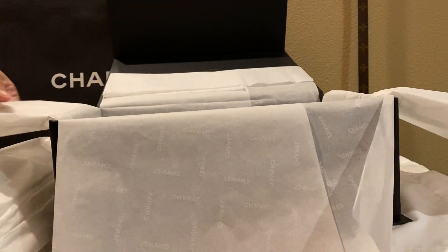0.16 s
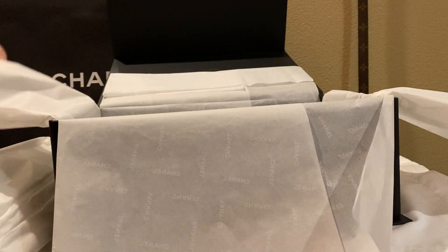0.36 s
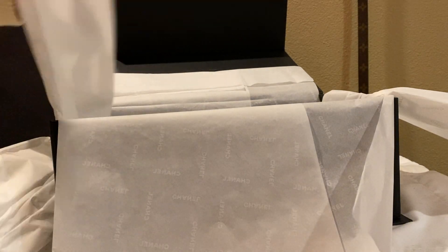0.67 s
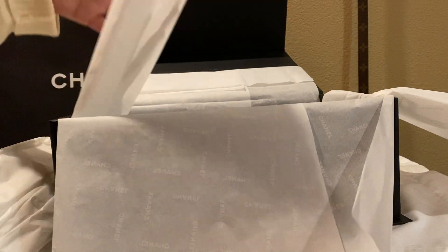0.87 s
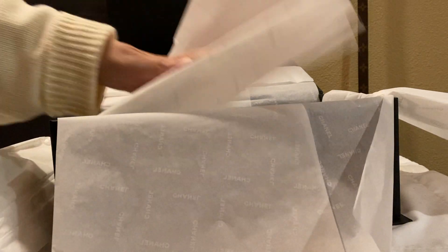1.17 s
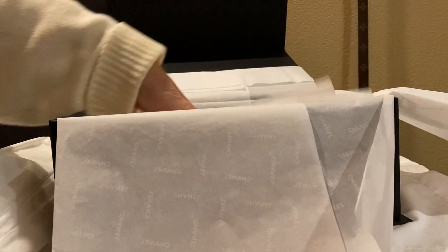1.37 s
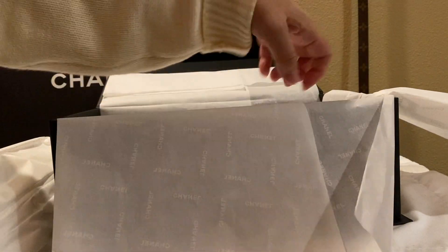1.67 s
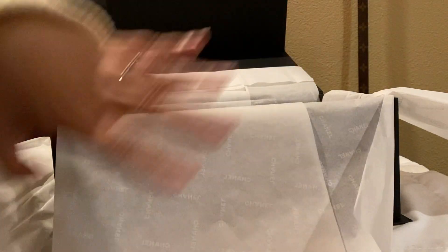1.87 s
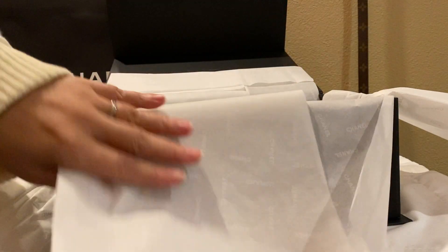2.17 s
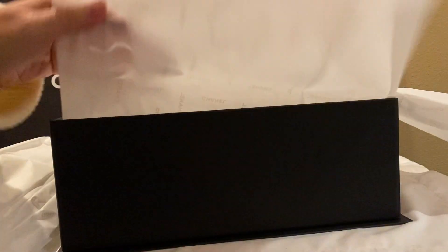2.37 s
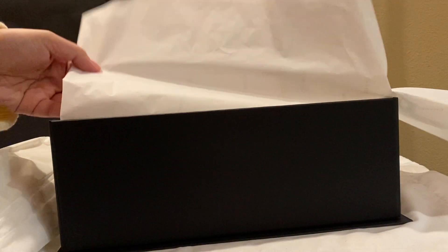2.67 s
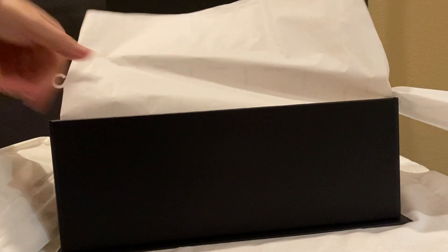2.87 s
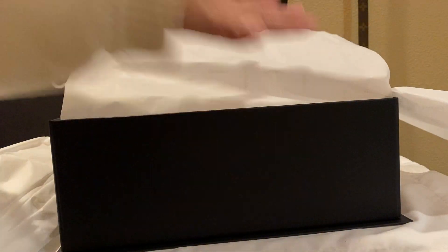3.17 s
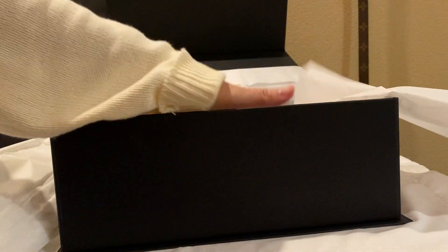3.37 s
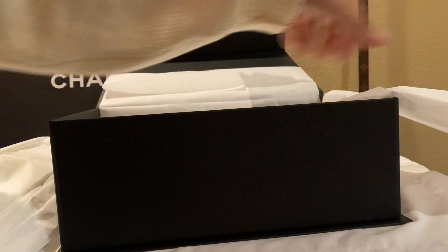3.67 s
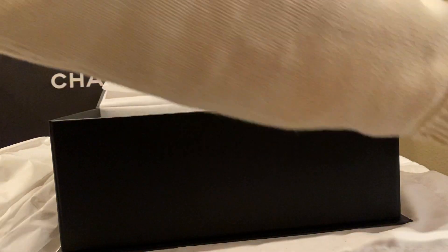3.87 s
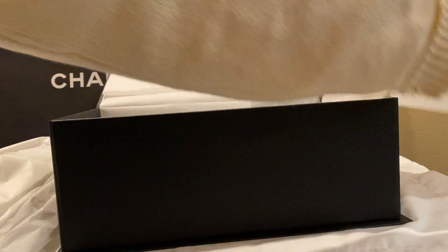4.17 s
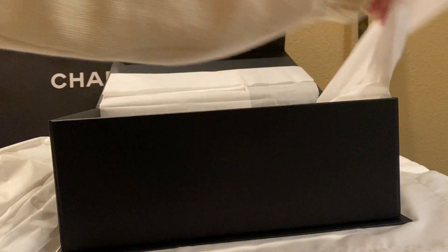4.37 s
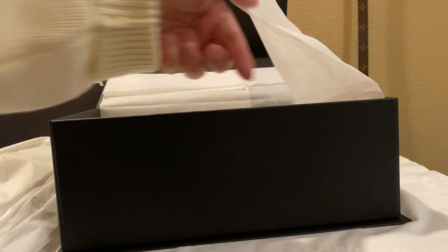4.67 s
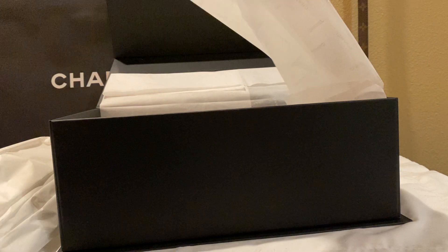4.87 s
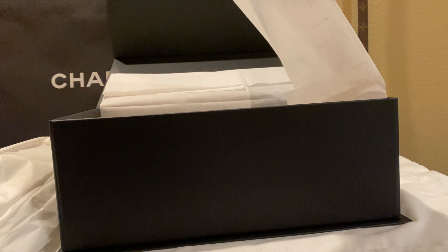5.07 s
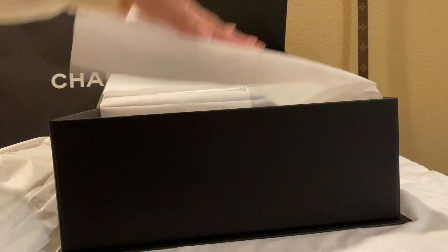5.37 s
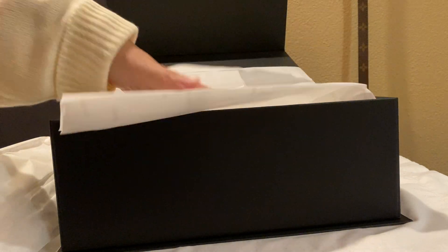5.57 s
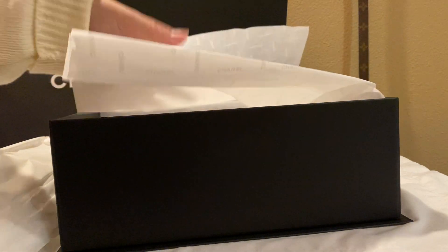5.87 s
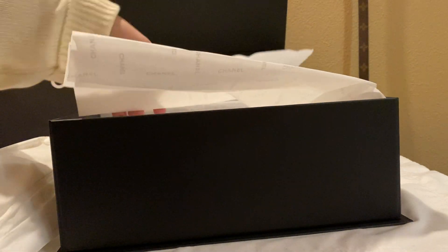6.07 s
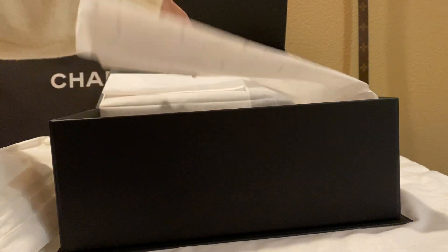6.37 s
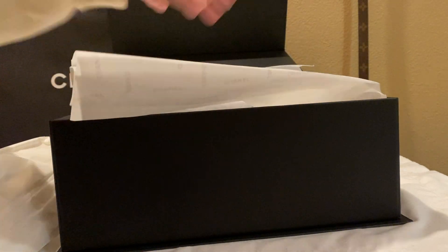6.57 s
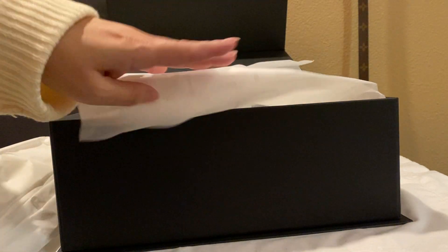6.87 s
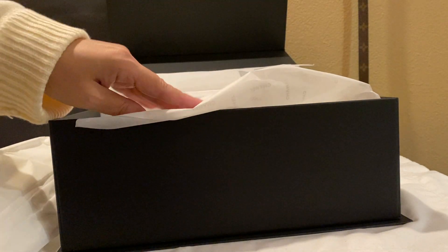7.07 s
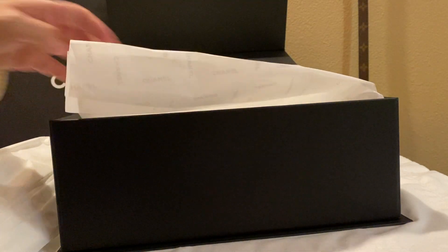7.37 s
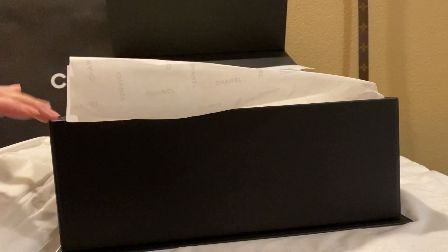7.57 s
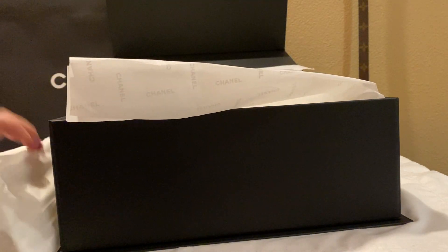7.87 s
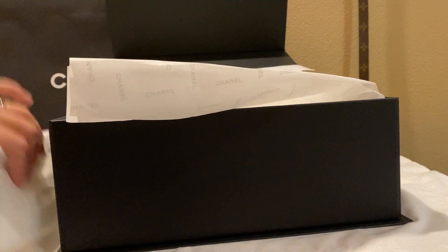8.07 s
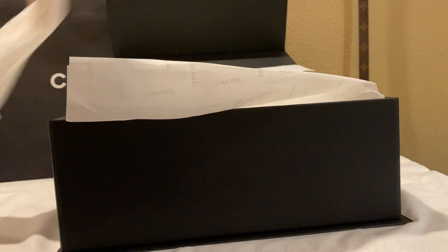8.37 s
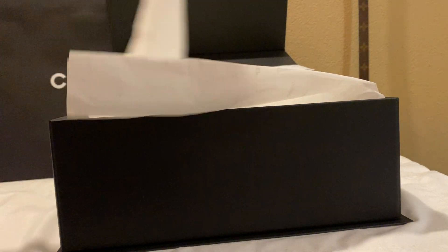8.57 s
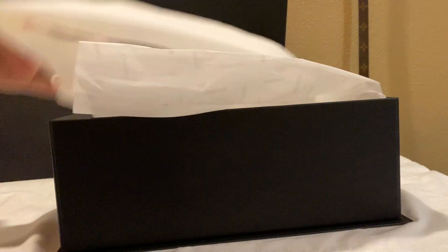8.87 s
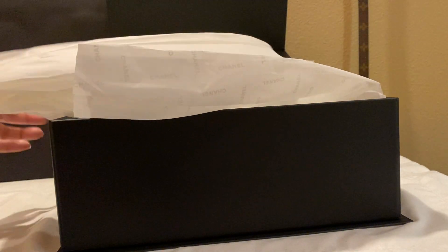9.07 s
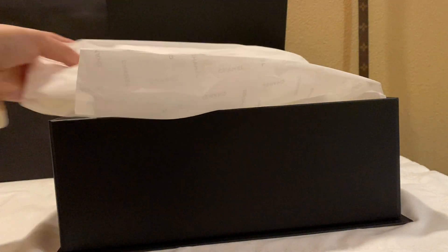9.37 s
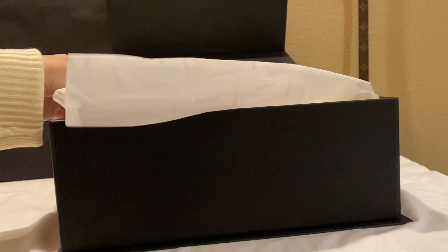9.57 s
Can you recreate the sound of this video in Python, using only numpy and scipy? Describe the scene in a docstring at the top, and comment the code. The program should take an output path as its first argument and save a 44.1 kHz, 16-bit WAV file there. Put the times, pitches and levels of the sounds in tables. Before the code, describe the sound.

Bright, dense paper crinkles start with small touches, grow into brisk folds, and break off into near silence with tiny ticks. The box adds a softer, hollow rustle and a few muted bumps. Later folds alternate between crisp and duller, fuller strokes until a sustained rustle closes the scene. It is recorded very near, in stereo, with a short dull room tail and a quiet bassy hum.

```python
"""A quiet furnished room, a bed, a two-port microphone close to the hands that fold tissue paper in and out of a box.
Thousands of tiny creases buckle in clumps: chance ticks, each with a dying noise flutter, shaped by drags and crushes.
Single creases snap as short noise bursts, and the cardboard box answers with a hollow rustle of slower grains.
A few soft thumps are decaying sines under a dull knock; a short room tail follows and filtered noise hums below."""
import sys
import numpy as np
from scipy import signal
from scipy.fft import rfft, irfft, next_fast_len
from scipy.io import wavfile
from scipy.ndimage import uniform_filter1d

SR = 44100
rng = np.random.default_rng(int(sys.argv[2]) if len(sys.argv) > 2 else 0)


def int16_out(signal):
    """Quantize to a 16-bit WAV file."""
    q = np.round(np.clip(np.atleast_2d(signal).T, -1, 1) * 32767)
    wavfile.write(sys.argv[1], SR, q.astype(np.int16))


def linear_from_db(decibels):
    """Turn decibels (scalar or array-like) into linear amplitude factors; 0 gives 1."""
    return 10 ** (np.asarray(decibels, float) / 20)


N = 428652   # samples
SIZE = next_fast_len(N + SR // 2)   # transform length, with space for tails
HZ = np.maximum(np.arange(SIZE // 2 + 1) * SR / SIZE, 1)


def rms_one(x):
    """Scale to rms 1."""
    return x / np.sqrt(np.mean(x ** 2) + 1e-20)


def in_time(rows):
    """Columns of a curve at every sample."""
    s, *columns = np.transpose(rows)
    return [np.interp(np.arange(N) / SR, s, c) for c in columns]


def over_hz(rows):
    """Columns of a spectrum at every frequency bin, joined along log frequency."""
    hz, *columns = np.transpose(rows)
    return [np.interp(np.log(HZ), np.log(hz), c) for c in columns]


def colour(x, spectrum):
    """Shape the spectrum of x by gains in dB."""
    gain = linear_from_db(over_hz(spectrum)[0])
    return irfft(rfft(x, SIZE) * gain, SIZE)[..., :N]


def drift(per_s):
    """Slow chance of rms 1: noise through two equal low-pass poles, drawn at every 20th sample."""
    r = np.exp(-2 * np.pi * 20 * per_s / SR)
    noise = rng.standard_normal(N // 20 + 3002)
    slow = signal.lfilter([1], [1, -2 * r, r * r], noise)[3000:]   # past the settling of the filter
    return np.interp(np.arange(N) / 20, np.arange(len(slow)), rms_one(slow))


def grains(per_s, spread_db, t60_s, clump_db, tick):
    """Random buckles in clumps: each is a tick and a dying flutter, heard along two unrelated paths."""
    clumps = linear_from_db(clump_db * drift(24.0))
    sizes = linear_from_db(spread_db * np.minimum(rng.exponential(1, N), 5))
    buckles = rms_one(sizes * clumps * (rng.random(N) < per_s / SR))
    keep = linear_from_db(-120 / (t60_s * SR))   # power left after one sample
    flutter = np.sqrt(signal.lfilter([1 - keep], [1, -keep], buckles ** 2 + 1e-18))
    ticks = tick * buckles * rng.choice([-1, 1], (2, N))
    return ticks + flutter * rng.standard_normal((2, N))


def crisp(x, top_db, split_hz=7500):
    """Raise or lower what lies above the split: small tight creases sound brighter."""
    top = signal.sosfilt(signal.butter(2, split_hz, "high", fs=SR, output="sos"), x)
    rest = signal.sosfilt(signal.butter(2, split_hz, "low", fs=SR, output="sos"), x)
    return rest - top * linear_from_db(top_db)   # the minus lets the halves meet in phase


def patchy(x, edges_hz, depth_db, per_s):
    """Each band between the edges swells and fades on its own as other patches of the surface take over."""
    below, out = 0, 0
    for hz in edges_hz:
        lower = signal.sosfiltfilt(signal.butter(2, hz, fs=SR, output="sos"), x)
        swell_db = depth_db * (drift(per_s) + drift(6 * per_s))
        out = out + (lower - below) * linear_from_db(swell_db)
        below = lower
    return out + x - below


# The sheet is gripped or dragged and crackles evenly. Each row: start in seconds, length in seconds,
# relative crackle level in dB, relative crispness in dB, relative hollow box rustle against the crackle in dB.
DRAGS = [(0, 0.0013, -44.5, -11.5, -10), (0.051, 0.096, -47.5, 2, -6.5), (0.233, 0.098, -44.5, -2, -4),
         (0.677, 0.16, -41, -10.5, -11), (0.917, 0.23, -46, -7, -21), (1.111, 0.13, -34.5, -7, -20),
         (1.281, 0.13, -36.5, -13, -8.5), (1.899, 0.0099, -51.5, -12, -7), (2.075, 0.13, -34, -3, -19.5),
         (2.512, 0.053, -36.5, 3.5, -2.5), (2.782, 0.12, -47, -8.5, 1.5), (3.043, 0.088, -56.5, -19.5, 7.5),
         (3.263, 0.075, -31.5, -2, -4), (3.962, 0.04, -50, -7, -18), (4.008, 0.054, -40.5, -2, -8.5),
         (4.127, 0.095, -39, -5.5, -3.5), (4.399, 0.27, -39, 2, -5), (4.771, 0.063, -46, 10, -3.5),
         (4.924, 0.07, -52, -10, -9), (5.254, 0.23, -34, -3.5, -12.5), (5.488, 0.1, -43, -2.5, 2.5),
         (5.65, 0.13, -47.5, 1, -6), (5.938, 0.2, -46, -2.5, -21.5), (6.167, 0.065, -35.0, -1, -23),
         (6.293, 0.13, -36.5, -1.5, -10), (6.493, 0.12, -44.5, -2, -12), (6.969, 0.23, -38.5, -1, -1.5),
         (7.645, 0.07, -44, 0, -2), (7.788, 0.14, -50.5, -3.5, -23), (7.931, 0.19, -43.5, 10.5, -12),
         (8.024, 0.073, -35.5, -9, -12), (8.532, 0.038, -41.5, 3, -12), (8.636, 0.28, -39.5, -7.5, -23.5),
         (8.78, 0.062, -32, -6.5, -3.5), (8.958, 0.031, -34.5, -10, -4.5), (9.047, 0.11, -44.5, -11.5, -9),
         (9.242, 0.12, -40.5, -11.5, -7.5), (9.31, 0.48, -36, -8.5, -7)]
# The sheet is crushed or pressed and the crackle swells to a peak. Each row: start in seconds, length in seconds,
# relative crackle level in dB, relative crispness in dB, relative hollow box rustle against the crackle in dB.
CRUSHES = [(0.388, 0.03, -41, 6, -1), (0.466, 0.2, -37.5, -4, -6), (0.625, 0.034, -38.5, 6.5, -4),
           (2.229, 0.074, -31, 2.5, -3.5), (2.354, 0.11, -30.5, 3, -2.5), (2.639, 0.015, -36, 2.5, 2.5),
           (3.391, 0.081, -30.5, -16.5, -9), (4.277, 0.057, -37, -5.5, -8), (6.767, 0.083, -47.5, 5, -17.5),
           (6.847, 0.13, -35.5, 8.5, 0), (7.153, 0.031, -32, -4, 0.5), (7.296, 0.034, -36, 2, -6),
           (7.401, 0.011, -42.5, -10, -3.5), (8.227, 0.12, -33, -12.5, -32),
           (8.392, 0.042, -37, -14.5, -28.5)]


def handling():
    """The hands' moves add in power; each sets the colour by its share, so the loudest prevails."""
    drag_swell_db, crush_swell_db = 2.33, 11.5   # growth while the move lasts
    attack_s, release_db_per_s = 0.006, 104   # after the move the sheet settles
    box_late_db, box_late_s = 11, 0.17   # the box joins in after the fingers have gripped the sheet
    rest_db = -80   # the sheets tick faintly even when let alone
    start, length, level_db, crisp_db, hollow_db = np.transpose(DRAGS + CRUSHES)[:, :, None]
    swell_db = np.repeat([drag_swell_db, crush_swell_db], [len(DRAGS), len(CRUSHES)])[:, None]
    s = np.arange(0, N + 64, 64) / SR
    since = s - start
    moving = np.maximum(since, 0)
    onset_db = 2 * 20 * np.log10(1e-9 - np.expm1(-moving / attack_s))
    pull_db = onset_db + swell_db * (moving / length - 1)
    settle_db = release_db_per_s * (length - since)
    move_db = np.maximum(level_db + np.minimum(pull_db, settle_db), -200)
    power = linear_from_db(move_db) ** 2
    total = power.sum(axis=0)
    share = power / total
    hollow_db = hollow_db - box_late_db * np.exp(-moving / box_late_s)
    crackle_db = 10 * np.log10(total + linear_from_db(rest_db) ** 2)
    crisp_db, hollow_db = (share * crisp_db).sum(axis=0), (share * hollow_db).sum(axis=0)
    return in_time(np.transpose([s, crackle_db, crisp_db, hollow_db]))


# Colour of creasing paper, for the crackle and the snaps. Each row: frequency in Hz, gain in dB.
PAPER = [(700, -9.5), (1400, -3), (2500, -2.5), (4000, -2.5), (7000, -3), (15500, -1)]


def crackle(level_db, crisp_db, hollow_db):
    """The dense crinkle of the moving sheet; a sheet that barely moves buckles less often."""
    per_s = 3000 * linear_from_db(1.5 * np.minimum(level_db + 43, 0))
    sheet = grains(per_s, spread_db=2.5, t60_s=0.024, clump_db=1.2, tick=0.3)
    sheet /= np.sqrt(uniform_filter1d(np.mean(sheet ** 2, axis=0), size=SR // 8) + 1e-9)   # even out
    # a few creases let go in a brief spit that stands out, most of all in soft handling
    lone = (rng.random(N) < 90 / SR) * rng.uniform(0.1, 1, N)
    lone_ticks = signal.lfilter([1], [1, -np.exp(-1 / (0.0013 * SR))], lone + 1e-18)
    spits = np.diff(lone_ticks * rng.standard_normal((2, N)), prepend=0)
    sheet += 2.53 * linear_from_db(-0.3 * np.clip(level_db + 38.5, -20, 0)) * spits
    # a sheet lifted off the box sounds thinner
    low = signal.sosfiltfilt(signal.butter(2, 2200, fs=SR, output="sos"), sheet)
    sheet += low * (linear_from_db(0.28 * (hollow_db + 14.0)) - 1)
    sheet = patchy(sheet, np.geomspace(1500, 7500, num=5), depth_db=1.5, per_s=4.4)
    # harder strokes are brighter, and the tightest creases come in spurts of their own
    tight_creases_db = 0.26 * (level_db + 49.5) + 2.24 * drift(65)
    sheet = crisp(sheet, 0.28 * crisp_db, split_hz=3000)   # slack sheets gather their sound in the low treble
    paper = colour(sheet * linear_from_db(level_db + 1.5), PAPER)
    return crisp(paper, 0.61 * crisp_db + tight_creases_db)


# Colour of the hollow cardboard box. Each row: frequency in Hz, gain in dB.
BOX = [(30, -38), (55, -13), (130, -13.5), (230, -8), (430, -0.5), (640, -2.5), (780, -5.5), (1000, -3.5),
       (1200, -11.5), (2400, -16.5)]


def box_rustle(level_db):
    """Sheets rubbing and knocking the cardboard walls: slower, longer grains that swell in a little late."""
    walls = colour(grains(600, spread_db=3.5, t60_s=0.05, clump_db=0.57, tick=0.18), BOX)
    walls /= np.sqrt(uniform_filter1d(np.mean(walls ** 2, axis=0), size=SR // 4) + 1e-9)   # even out
    walls = rms_one(patchy(walls, np.geomspace(120, 1400, num=6), depth_db=2.2, per_s=2.5))
    keep = np.exp(-1 / (0.0012 * SR))
    swell = signal.lfilter([1 - keep], [1, -keep], linear_from_db(level_db + 3.5))
    return walls * swell


# Colour of the hum in the furnished room. Each row: frequency in Hz, gain in dB.
ROOM_HUM = [(18, -16.5), (30, 6), (103, -4), (499, -22), (9220, -11.5), (16000, -28)]


def room_hum():
    """The quiet room's steady hum: noise with most of its strength in the bass."""
    return linear_from_db(-70) * rms_one(colour(rng.standard_normal((2, N)), ROOM_HUM))


def dying_noise(t60_s, count):
    """Bursts of noise that fall 60 dB in t60_s; energy 1 each."""
    t = np.arange(SR // 2) / SR
    burst = rng.standard_normal((count, len(t))) * linear_from_db(-60 * t / t60_s)
    return burst / np.sqrt(np.sum(burst ** 2, axis=1, keepdims=True))


def room(x):
    """A short dull tail from walls and bedding: the sound convolved with softened dying noise."""
    tail = signal.lfilter([.6], [1, -.4], dying_noise(t60_s=0.14, count=2))
    return linear_from_db(-6.5) * signal.oaconvolve(x, tail, axes=1)[:, :N]


# Single creases that snap. Each row: start in seconds, relative level in dB.
SNAPS = [(0.434, -19), (1.5857, -38), (1.6676, -46), (1.694, -47), (1.776, -46), (1.8544, -47),
         (1.9108, -34), (1.996, -45), (2.009, -40), (2.036, -45), (2.057, -40), (2.7537, -26),
         (2.7856, -31), (2.9712, -40), (2.467, -25), (2.825, -26.5), (2.8689, -27), (3.008, -28),
         (3.068, -34), (3.1124, -35), (3.171, -47), (3.1917, -43), (3.2336, -43), (3.846, -47),
         (4.933, -30.5), (5.1264, -45.5), (5.2492, -34), (5.6753, -23.5), (5.847, -43), (5.954, -38),
         (6.793, -35.5), (6.933, -22), (7.344, -30), (7.5867, -40), (7.661, -31), (7.806, -36),
         (7.9575, -42), (8.5472, -41), (9.2592, -35.5)]


def snaps():
    """Each crease gives a sharp tick and a short flutter around a pitch of its own, some brighter than others."""
    out, length = np.zeros((2, N + SR)), SR // 10
    t = np.arange(length) / SR
    for s, level_db in SNAPS:
        noise, hz = rng.standard_normal((2, length)), rng.uniform(3200, 3800)
        flutter = signal.lfilter(*signal.iirpeak(hz, 3.0, SR), noise) * linear_from_db(-7 - 60 * t / 0.051)
        tick = crisp(noise * linear_from_db(-60 * t / 0.016), rng.normal(4, 4))
        at = round(s * SR)
        out[:, at:at + length] += linear_from_db(level_db - 4.5) * (tick + flutter)
    return colour(out[:, :N], PAPER)


# A hand or sheet lands on the box. Each row: start in seconds, relative level in dB, pitch in Hz,
# time in seconds for the swing to fall 60 dB.
THUMPS = [(2.49, -37.5, 86, 0.28), (2.894, -38, 269.4, 0.17), (3.289, -29, 73.6, 0.044),
          (6.934, -38.5, 198, 0.094), (7.346, -39, 131, 0.036), (7.474, -46.5, 480, 0.052)]


def thumps():
    """A soft push sets the box wall swinging for a few cycles, with a short dull knock on top."""
    out, t = np.zeros(N + SR), np.arange(SR // 2) / SR
    dull = signal.butter(2, [250, 1300], "band", fs=SR, output="sos")
    for s, level_db, hz, t60_s in THUMPS:
        at = round(s * SR)
        soft_start = 1 - np.exp(-t / 0.00045)
        swing = np.sin(2 * np.pi * hz * t) * soft_start * linear_from_db(-60 * t / t60_s)
        knock = signal.sosfilt(dull, rng.standard_normal(len(t)) * linear_from_db(14.0 - 60 * t / 0.073))
        out[at:at + len(t)] += linear_from_db(level_db) * (swing + knock)
    return out[:N] * [[1], [0]]   # on the first path only


def scene():
    """Two unrelated paths of every source, to be shared out by the ports."""
    crackle_db, crisp_db, hollow_db = handling()
    paper = crackle(crackle_db, crisp_db, hollow_db) + snaps()
    box = box_rustle(crackle_db + hollow_db) + thumps()
    near = paper + box
    return near + room(near) + room_hum()


def roll_off(x):
    """The treble ends steeply here."""
    return signal.sosfilt(signal.butter(12, 16970, fs=SR, output="sos"), x)


# How the microphone's two ports differ. Each row: frequency in Hz, likeness from 0 to 1,
# left lead in radians before the treble turn, left over right in dB.
PORTS = [(150, .95, .05, 2), (800, .7, .3, 1.5), (1800, .45, .9, 2), (3500, .5, .3, 3),
         (5500, .55, -.3, 2.5), (6600, .85, .2, 1), (7200, .97, .1, .3), (7900, 1, 0, 0)]


def record(dry):
    """The right port hears the left signal turned in phase, plus its own share; in the treble only the turned one."""
    turn_from_hz, turn_every_hz = 7035, 4060   # above this one full turn of phase per step, two at most
    cutoff_hz, low_cut_hz = 15800, 51
    alike, lead, balance_db = over_hz(PORTS)
    alike = np.clip(alike, 0, 1)
    turn = 2 * np.pi * np.clip((HZ - turn_from_hz) / turn_every_hz, 0, 2)
    lead = lead - turn + 0.11 * np.sin(2 * turn)   # lingers where the ports agree or oppose
    passed = (HZ < cutoff_hz) / np.sqrt(1 + (low_cut_hz / HZ) ** 6)
    shared, own = rfft(dry, SIZE) * passed
    right = alike * shared * np.exp(-1j * lead) + np.sqrt(1 - alike ** 2) * own
    ports = irfft([shared * linear_from_db(balance_db / 2), right * linear_from_db(-balance_db / 2)], SIZE)[:, :N]
    return roll_off(ports)


dry = scene()
out = record(dry)
int16_out(out)
```